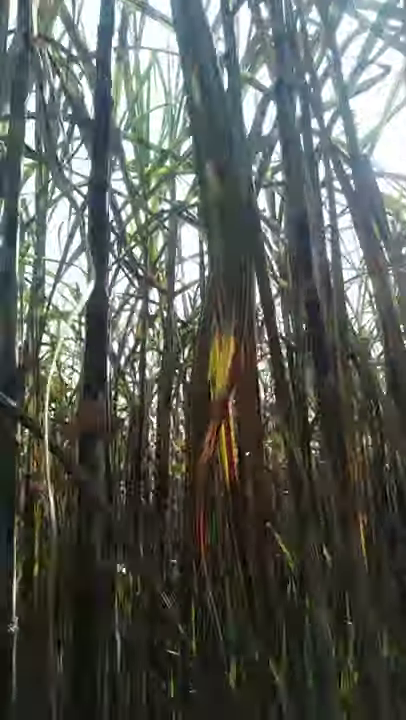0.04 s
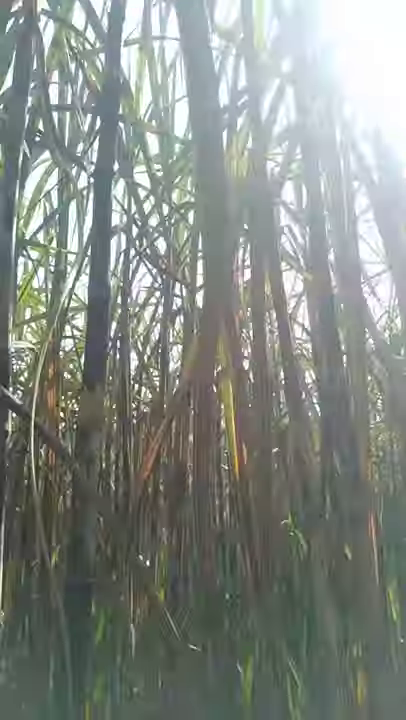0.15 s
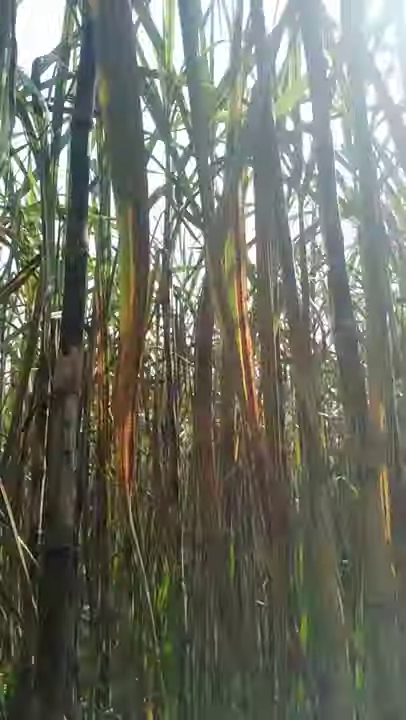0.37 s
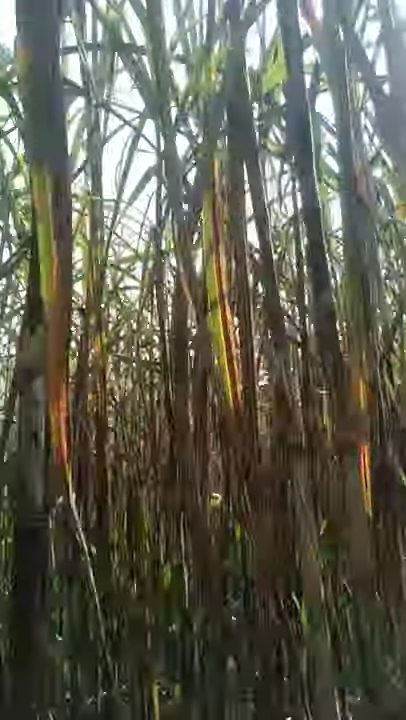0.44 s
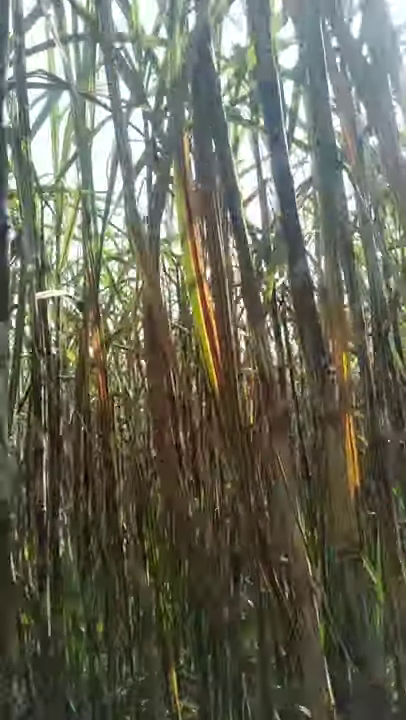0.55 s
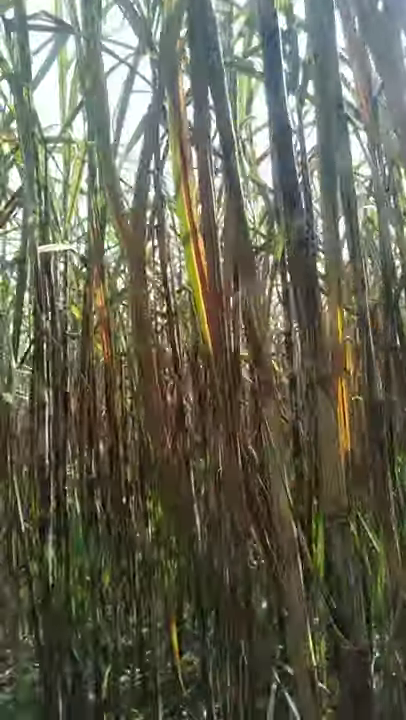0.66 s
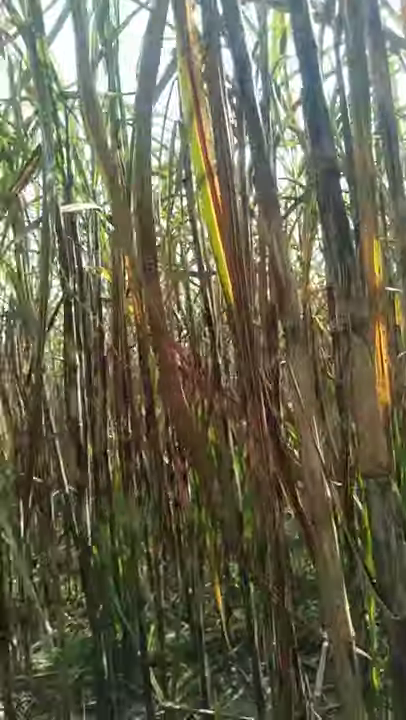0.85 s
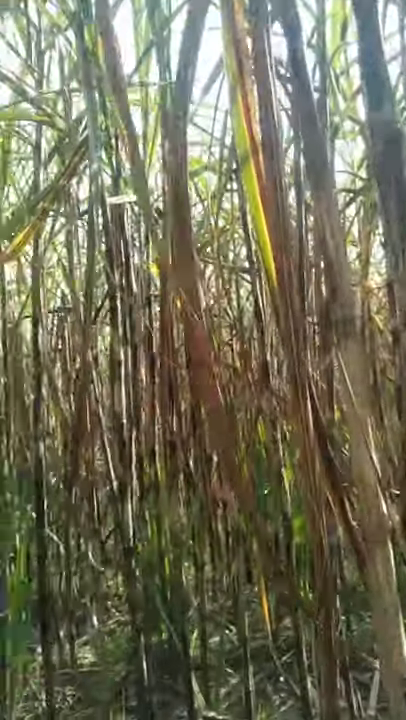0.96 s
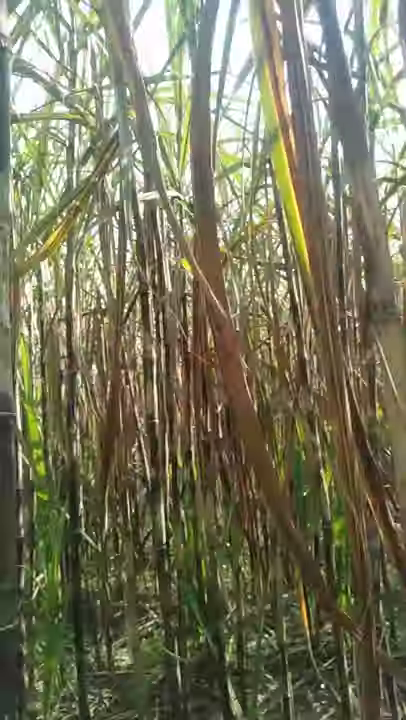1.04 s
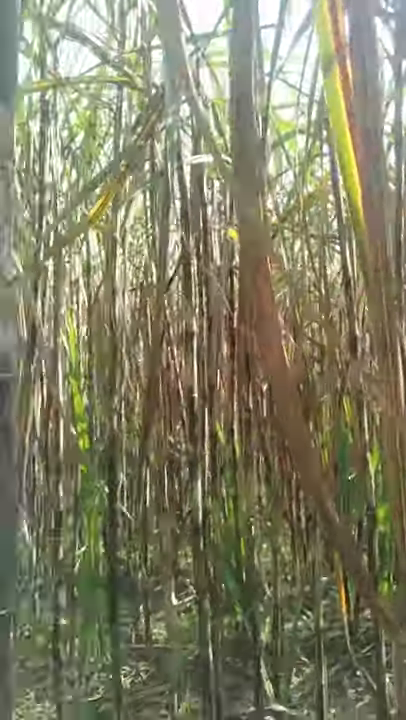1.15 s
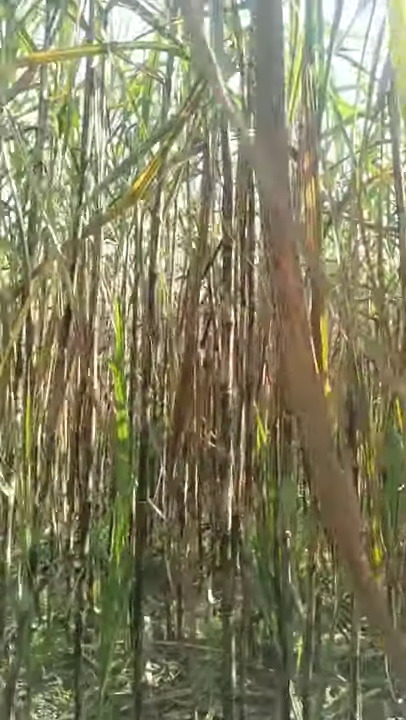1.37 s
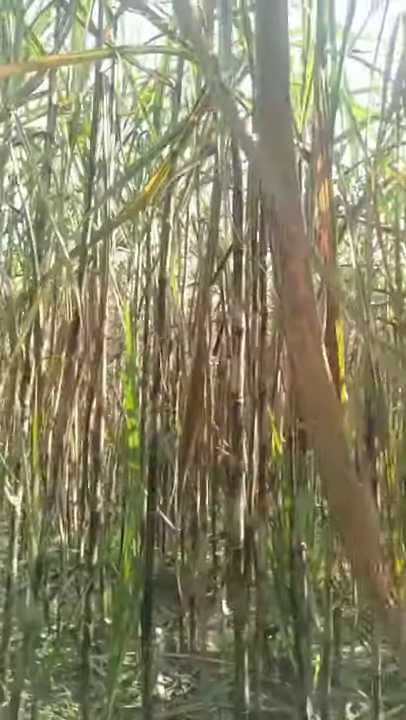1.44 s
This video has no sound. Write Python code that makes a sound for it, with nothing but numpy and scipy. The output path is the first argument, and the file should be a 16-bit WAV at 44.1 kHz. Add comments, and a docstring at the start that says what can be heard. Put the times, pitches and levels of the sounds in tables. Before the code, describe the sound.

Stiff, dry leaves drag over each other in a cane field, swelling into brittle crackles and knocks as they rub the microphone. A small snap and a soft low step follow, with faint rustling all around.

```python
"""In a field of dry sugarcane, someone pushes through with a phone. Stiff leaves drag over each other
in stick-slip friction, loudest as one clump sweeps past the microphone. Blades crackle and ribs tick
in small brittle fractures; stalks knock and one sheath snaps, each ringing in its own damped modes.
The field rustles all around, leaves rub the phone's case, and wind rumbles on the microphone.
A footfall lands with a soft, low thump, and a weaker thump follows."""
import sys
import numpy as np
from scipy import signal
from scipy.fft import rfft, irfft
from scipy.io import wavfile

SR = 44100
rng = np.random.default_rng(int(sys.argv[2]) if len(sys.argv) > 2 else 0)


def wav_out(sig):
    """Save sig, one row per channel (or a flat mono array), as 16-bit PCM at SR to the path in sys.argv[1]."""
    wavfile.write(sys.argv[1], SR, np.round(np.clip(np.atleast_2d(sig).T, -1, 1) * 32767).astype(np.int16))


N = 66150

# Spectra of a cracking leaf and of a flexing blade. Each row: frequency in Hz, relative gain in dB.
CRACK_SPECTRUM = [(500, -32), (1200, -7), (1700, -5.5), (2300, -1), (2900, -4.5), (3800, -1.5), (5000, 1),
                  (5800, -2.5), (6300, -9), (7000, -12), (7700, -33.5)]
BLADE_SPECTRUM = [(60, -30.5), (160, -9.5), (270, -8), (400, -5), (560, -4), (760, -6.5), (980, -3),
                  (1300, -8), (1700, -15), (3000, -36)]

FLEXES_PER_S, FLEX_SPREAD_DB = 1300, 2.5
FRACTURES_PER_S, FRACTURE_SPREAD_DB = 7000, 2
EDGE_Q, BODY_Q = 10.8, 5  # resonances of a blade's edge and of its hollow body


def undb(db):
    """Amplitude grows tenfold for every 20 dB."""
    return 10 ** (np.asarray(db) / 20)


def unit(x):
    """Dividing by the rms gives a signal unit power."""
    return x / np.sqrt(np.mean(x ** 2) + 1e-18)


def curve(t, table, column=1):
    """Interpolating timed levels in dB gives a gain that grows or decays exponentially between them."""
    rows = np.array(table)
    return undb(np.interp(t, rows[:, 0], rows[:, column]))


def colour(x, spectrum):
    """A minimum-phase filter imposes a spectrum causally, with unit power gain."""
    size = 4096
    hz, db = np.array(spectrum).T
    bin_hz = np.arange(size // 2 + 1) * SR / size
    log_gain = np.log(undb(np.interp(np.log(bin_hz + 1), np.log(hz), db)))
    cepstrum = irfft(log_gain)
    cepstrum[1:size // 2] *= 2  # fold onto positive time
    cepstrum[size // 2 + 1:] = 0
    response = irfft(np.exp(rfft(cepstrum)))
    return signal.fftconvolve(x, response / np.linalg.norm(response))[:N]


def wander(per_s):
    """Joining Gaussian values by straight lines gives a slow random modulation."""
    values = rng.standard_normal(N)
    return np.interp(np.arange(N) * per_s / SR, np.arange(N), values)


def clicks(per_s, spread_db):
    """Independent impulses, many weak and a few strong, form a Poisson train of unit power."""
    hit = rng.random(N) < per_s / SR
    strength = np.minimum(rng.exponential(size=N), 4)
    polarity = np.sign(rng.standard_normal(N))
    return unit(hit * polarity * undb(spread_db * strength))


def burst(grains, envelope):
    """Amplitude modulation shapes grains into a burst, scaled to the envelope's energy."""
    x = grains * envelope
    return x * np.linalg.norm(envelope) / (np.linalg.norm(x) + 1e-12)


def resonate(x, hz, q, db):
    """A resonance favours one band; the total energy is kept."""
    b, a = signal.iirpeak(hz, q, fs=SR)
    y = x + undb(db) * signal.lfilter(b, a, x + 1e-18)
    return y * np.linalg.norm(x) / (np.linalg.norm(y) + 1e-12)


def ring(t, start, modes, contact_s=0.00098):
    """Free vibration: modes build up during a brief contact and decay exponentially."""
    age = np.maximum(t - start, 0)
    out = np.zeros(N)
    for hz, db, t60 in modes:
        decay = np.exp(-np.log(1000) * age / t60)
        out += undb(db) * np.sin(2 * np.pi * (hz * age + rng.random())) * decay
    return out * (1 - np.exp(-age / contact_s))


def dragging_leaves(t):
    """Stick-slip friction: leaf edges catch and release while the broad blades flex like paper."""
    # Leaves passing close by. Each row: time in seconds, scraping level in dB, flexing level in dB.
    levels = [(0, -48.5, -62), (.06, -45.5, -53), (.115, -56, -64), (.165, -50, -58.5), (.205, -44, -53.5),
              (.262, -49.5, -58), (.32, -45, -59), (.40, -45.5, -60), (.44, -32.5, -41),
              (.475, -33.5, -41.5), (.505, -40, -52), (.53, -35, -41.5), (.63, -29.5, -41),
              (.695, -33.5, -38), (.735, -32, -40.5), (.79, -36, -40), (.87, -42.5, -50.5),
              (.925, -40.5, -49.5), (.95, -44, -55), (1.005, -45.5, -50), (1.04, -39.5, -48),
              (1.06, -47, -51.5), (1.13, -38.5, -48), (1.19, -47.5, -61), (1.24, -43.5, -52),
              (1.31, -52.5, -64.5), (1.345, -47.5, -55.5), (1.415, -55.5, -59.5), (1.455, -51, -53.5),
              (1.5, -62.5, -74)]
    # Spectrum of the slips. Each row: frequency in Hz, relative gain in dB.
    scrape_spectrum = [(500, -29.5), (1200, -16.5), (1700, -11), (2200, -2.5), (2900, -5.5), (3800, -3),
                       (4300, -2.5), (5000, 0.7), (5800, -1.3), (6300, -11), (7000, -15), (7700, -37.5)]
    catch = undb(2 * wander(per_s=230))  # scraping and flexing flicker together
    scrape = unit(clicks(per_s=5200, spread_db=2) * catch) * curve(t, levels)
    flex = unit(clicks(FLEXES_PER_S, FLEX_SPREAD_DB) * catch) * curve(t, levels, column=2)
    return colour(scrape, scrape_spectrum) + colour(flex, BLADE_SPECTRUM)


def distant_leaves(t):
    """Incoherent summation: countless far leaves merge into a soft, flickering noise."""
    # Spectrum of the rustle. Each row: frequency in Hz, relative gain in dB.
    spectrum = [(30, 4), (70, -0.5), (120, -13.5), (250, -13.5), (460, -8.5), (600, -7), (950, 3),
                (1600, -3.5), (2300, -0.5), (2800, -14.5), (3200, -9), (4900, 0.5), (5800, -7),
                (7000, -14.5), (7700, -40)]
    # Course of the rustle. Each row: time in seconds, level in dB.
    levels = [(0, -45), (.5, -54.5), (1.1, -51.5), (1.35, -54.5), (1.5, -59)]
    rustle = rng.standard_normal(N) * undb(0.95 * wander(per_s=40))
    return colour(rustle, spectrum) * curve(t, levels)


def wind(t):
    """Turbulence: wind on the microphone makes a low rumble."""
    # Spectrum of the rumble. Each row: frequency in Hz, relative gain in dB.
    spectrum = [(10, -5), (28, 0), (60, -8.5), (90, -14.5), (150, -31.5), (400, -57)]
    # Course of the rumble. Each row: time in seconds, level in dB.
    levels = [(0, -63), (.55, -59), (.66, -52.5), (.77, -63.5), (.95, -46), (1.04, -36), (1.09, -45),
              (1.16, -52.5), (1.28, -51.5), (1.33, -58), (1.40, -53.5), (1.5, -50.5)]
    return colour(rng.standard_normal(N), spectrum) * curve(t, levels)


def case_rubbing(t):
    """Structure-borne sound: blades sliding over the phone's case reach the microphone as a dull rub."""
    # Response of the case. Each row: frequency in Hz, relative gain in dB.
    spectrum = [(35, -20), (70, -8), (110, -0.5), (175, 1.5), (250, -10.5), (330, -12), (500, -17.5),
                (1000, -42)]
    # Course of the rubbing. Each row: time in seconds, level in dB.
    levels = [(0, -76), (.41, -73), (.46, -45), (.49, -55.5), (.56, -59), (.62, -49.5), (.66, -39.5),
              (.71, -45.5), (.76, -55), (.86, -65.5), (1.1, -66.5), (1.5, -73)]
    return colour(clicks(FLEXES_PER_S, FLEX_SPREAD_DB), spectrum) * curve(t, levels)


def rib_ticks(t, tail_db=-20.5, tail_s=0.0014):
    """Brittle fracture: a leaf rib gives way in one impulse, and a few fibres tear after it."""
    # Breaking ribs. Each row: start in seconds, level in dB, edge resonance in Hz, its strength in dB.
    ticks = [(.1302, -12.5, 4100, -1), (0.3136, -15.5, 5700, 4), (0.338, -16, 5030, 8.5),
             (0.4275, -8, 5700, -1), (0.4452, -13, 3980, -8), (.4507, -3.5, 5350, 11.5),
             (.6204, -8.5, 5200, 4.5), (.6548, -8.5, 4900, 4.5), (0.7435, -7, 3860, 5.5),
             (1.2535, -19, 2100, 5.5), (1.2808, -19, 3140, 9)]
    fibres = clicks(FRACTURES_PER_S, FRACTURE_SPREAD_DB)
    out = np.zeros(N)
    for start, db, edge_hz, ring_db in ticks:
        after = t >= start
        tick = burst(fibres[after], undb(tail_db) * np.exp(-(t[after] - start) / tail_s))
        tick[0] = 1  # the break itself
        out[after] += undb(db) * resonate(tick, edge_hz, EDGE_Q, ring_db)
    return colour(out, CRACK_SPECTRUM)


def blade_crackles(t):
    """Impulse excitation: a run of small fractures rings the edge and hollow body of a dry blade."""
    # Crackling blades. Each row: peak time in seconds, relative level in dB, rise and decay in seconds,
    # edge resonance in Hz, its strength in dB, level offset of the body in dB, body resonance in Hz.
    crackles = [(0.187, -36, .001, 0.0026, 4700, 4, -12.5, 1050),
                (0.1978, -33.5, 0.00058, 0.0022, 4380, 0, -13, 900),
                (0.2105, -35, .005, 0.0047, 5300, -13, -14, 940),
                (0.313, -30, 0.00018, 0.0022, 2070, -1, -10, 1350),
                (.3262, -33, .0004, 0.0012, 4730, 4, -21, 1100),
                (0.4278, -24, 0.0003, 0.009, 5900, 7, -11, 1106),
                (0.4499, -20.5, .0004, 0.0045, 5450, 2, -9.5, 1050),
                (0.4582, -24.5, 0.0011, 0.0055, 3700, -6, -11, 950),
                (0.4666, -25, .001, 0.0048, 3500, -2, -6, 1300),
                (.5220, -26, 0.0024, 0.0038, 5550, 0, -23, 1240),
                (.5600, -25.5, 0.0021, 0.0042, 5400, 3.5, -10, 960),
                (0.595, -21, 0.0028, .002, 5300, 0.5, -17, 966),
                (0.6129, -26.5, 0.0021, 0.0014, 5800, -3, -3.5, 1035),
                (0.6203, -18.5, 0.00054, 0.002, 5200, 7.5, -21, 1130),
                (0.634, -25.5, 0.0018, .003, 3660, 11, -14, 970),
                (0.6544, -22.5, 0.00088, 0.0037, 4980, 7, -10, 1090),
                (0.6598, -31.5, .001, 0.0029, 5700, -2, -4, 1010),
                (0.6684, -28, 0.0023, .003, 4900, 6.5, -19, 1400),
                (.7060, -30, 0.0018, 0.0079, 5140, 0, -12.5, 540),
                (0.7313, -26, .004, 0.0045, 5000, 2, -11, 478),
                (0.739, -21, 0.0014, 0.0033, 4840, -0.5, -18.5, 593),
                (0.7429, -20.5, .0006, 0.0017, 4440, -2.5, -16.5, 1290),
                (0.7771, -28, .002, 0.0044, 5800, 8, -17.5, 980),
                (0.8007, -37, .002, 0.004, 4900, 3, -1, 1040),
                (0.9084, -31, .006, 0.0029, 4800, -6.5, -15.5, 980),
                (0.9164, -24.5, 0.00033, 0.002, 4850, 9, -23, 1400),
                (0.9637, -30, 0.0019, 0.0083, 4440, 0, -8, 920),
                (1.0628, -33, .0005, 0.0024, 5100, -5, -17.5, 950),
                (1.0758, -31, 0.00086, 0.0067, 3080, 16, -18, 950),
                (1.121, -38.5, .001, 0.0082, 3240, 12, -8, 954),
                (1.1480, -35, .001, 0.0032, 3100, 7, -20, 950),
                (1.4276, -35.5, 0.00025, 0.0032, 4670, -4, -5, 745),
                (1.448, -44, 0.00033, 0.0028, 3450, -2, 3.5, 970)]
    fractures = clicks(FRACTURES_PER_S, FRACTURE_SPREAD_DB)
    shakes = clicks(FRACTURES_PER_S, FRACTURE_SPREAD_DB)
    edge, body = np.zeros(N), np.zeros(N)
    for peak, db, rise, decay, edge_hz, ring_db, body_db, body_hz in crackles:
        near = np.abs(t - peak) < .06
        age = t[near] - peak
        envelope = undb(db) * np.exp(-np.maximum(-age / rise, age / decay))
        edge[near] += resonate(burst(fractures[near], envelope), edge_hz, EDGE_Q, ring_db)
        body[near] += undb(body_db) * resonate(burst(shakes[near], envelope), body_hz, BODY_Q, db=5.5)
    return undb(-2) * colour(edge, CRACK_SPECTRUM) + undb(-2.5) * colour(body, BLADE_SPECTRUM)


def stalk_knocks(t):
    """Impact excites normal modes: each cane sounds its own hollow note and the ring of its hard rind."""
    # Colliding canes. Each row: start in seconds, level in dB, pitch in Hz, 60 dB decay time in seconds.
    knocks = [(.2070, -43.5, 470, 0.047), (0.4496, -10.5, 947, .013), (0.4652, -19, 366, 0.011),
              (.7110, -26, 980, .02), (0.7371, -18.5, 594, 0.028), (0.7423, -27, 1330, 0.018),
              (0.9631, -28, 965, 0.023)]
    # Modes of the rind. Each row: frequency in Hz, relative level in dB, 60 dB decay time in seconds.
    rind_modes = [(3670, -21.5, .026), (4850, -13, .035)]
    return sum(undb(db) * ring(t, start, [(hz, 0, t60)] + rind_modes) for start, db, hz, t60 in knocks)


def sheath_snap(t):
    """Sudden release of strain sets a dry sheath ringing as it snaps."""
    # Modes of the sheath. Each row: frequency in Hz, relative level in dB, 60 dB decay time in seconds.
    modes = [(1940, -3, 0.023), (2180, -0.5, 0.028), (2720, 0.5, 0.019), (3050, -3, 0.026),
             (4550, -7, 0.017), (4960, -3, 0.021)]
    return undb(-24) * ring(t, start=.9162, modes=modes)


def footfall(t):
    """A soft impact carries only low frequencies: a footfall thumps, with a weaker thump just after."""
    # Low thumps. Each row: centre in seconds, frequency in Hz, peak in dB, half width in seconds.
    thumps = [(0.997, 61, -30.5, 0.014), (1.060, 63.6, -37.5, 0.013)]
    out = np.zeros(N)
    for centre, hz, db, half_width in thumps:
        envelope = undb(db) * np.exp(-((t - centre) / half_width) ** 2)
        out -= envelope * np.cos(2 * np.pi * hz * (t - centre))
    return out


def scatter(x, t, tail_db=-14, t60_s=0.057):
    """Scattering from the surrounding canes adds a short, faint tail to the direct sound."""
    tail = rng.standard_normal(N) * np.exp(-np.log(1000) * t / t60_s)
    return x + undb(tail_db) * signal.fftconvolve(x, tail / np.linalg.norm(tail))[:N]


def scene():
    """Superposition: near and distant cane, rubbing, wind and the footfall add in one channel."""
    t = np.arange(N) / SR
    near = dragging_leaves(t) + blade_crackles(t) + rib_ticks(t) + stalk_knocks(t) + sheath_snap(t)
    return (scatter(near, t) + distant_leaves(t) + case_rubbing(t) + wind(t) + footfall(t))[None]


def record(dry, cutoff_hz=7700):
    """Band limiting: the phone's steep low-pass filter removes the highest treble."""
    return signal.sosfilt(signal.ellip(10, .2, 75, cutoff_hz, fs=SR, output="sos"), dry)


dry = scene()
out = record(dry)
wav_out(out)
```